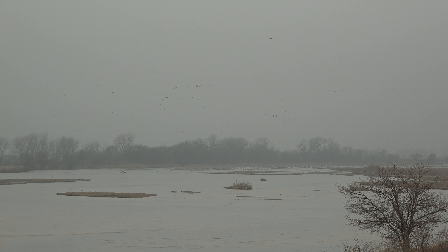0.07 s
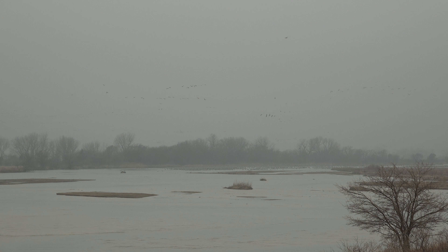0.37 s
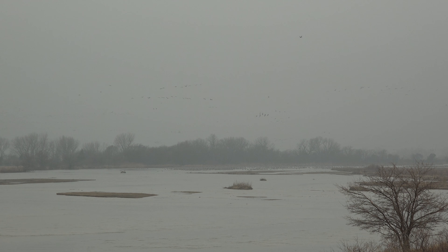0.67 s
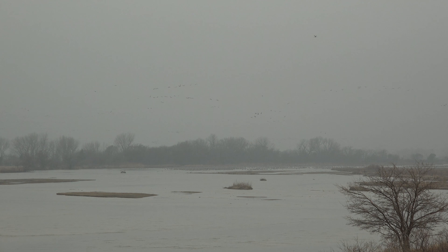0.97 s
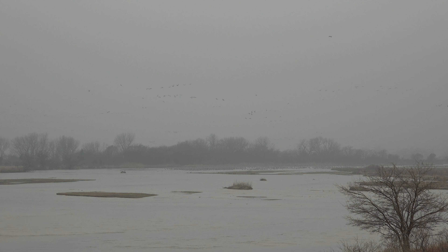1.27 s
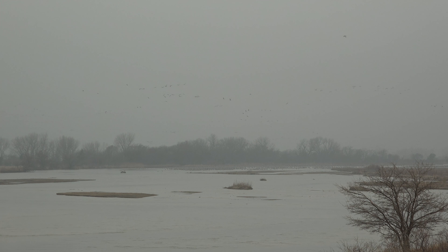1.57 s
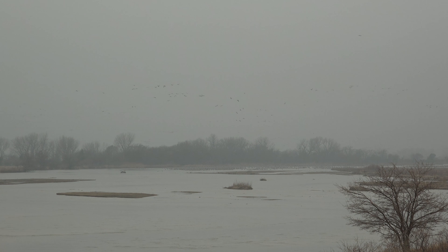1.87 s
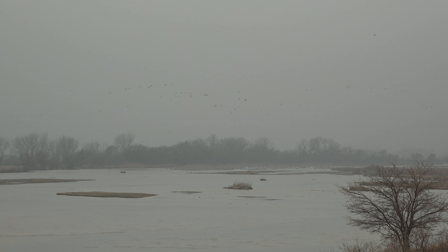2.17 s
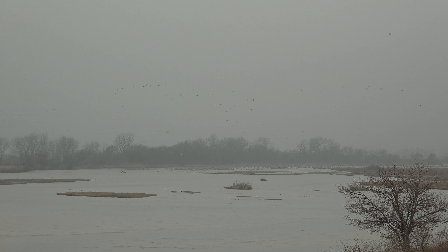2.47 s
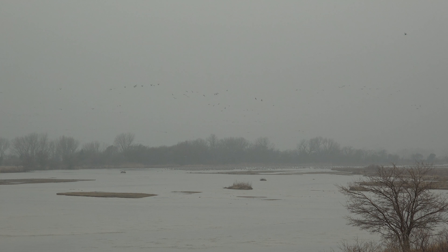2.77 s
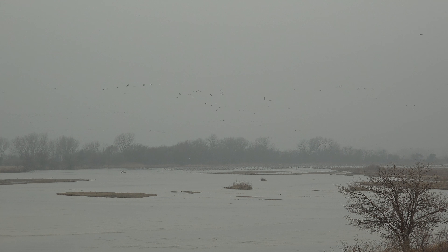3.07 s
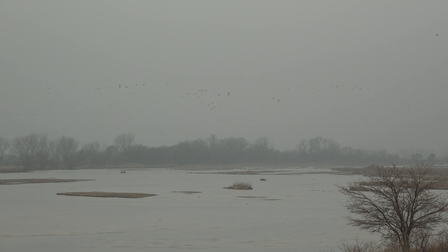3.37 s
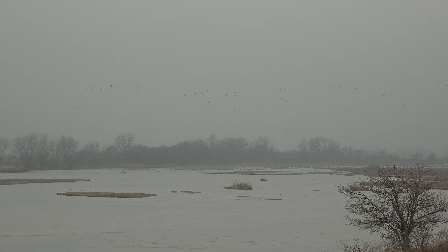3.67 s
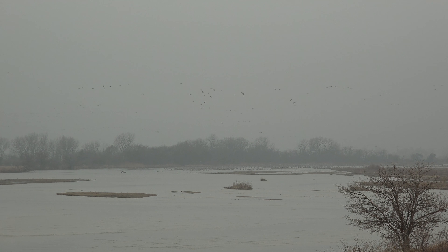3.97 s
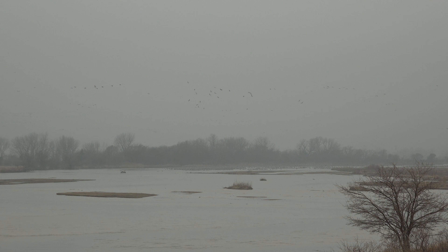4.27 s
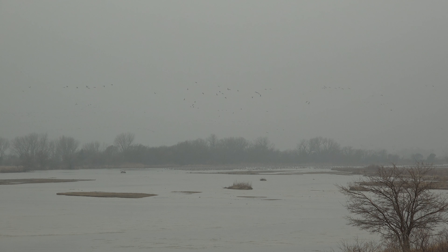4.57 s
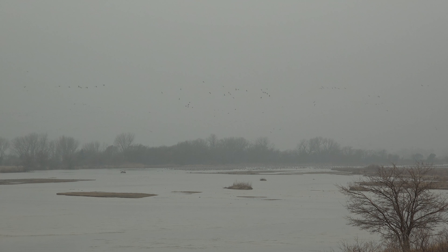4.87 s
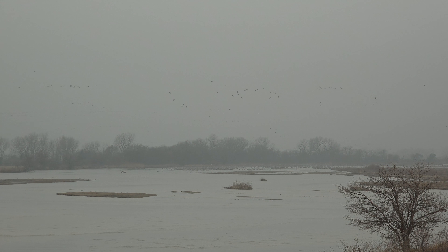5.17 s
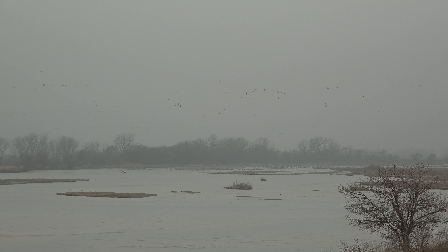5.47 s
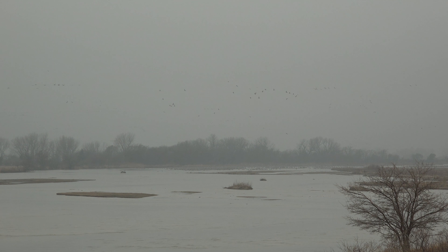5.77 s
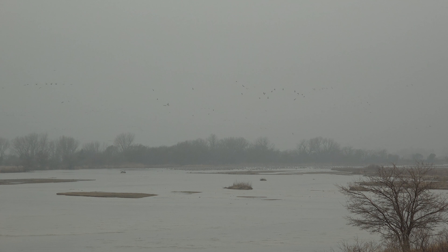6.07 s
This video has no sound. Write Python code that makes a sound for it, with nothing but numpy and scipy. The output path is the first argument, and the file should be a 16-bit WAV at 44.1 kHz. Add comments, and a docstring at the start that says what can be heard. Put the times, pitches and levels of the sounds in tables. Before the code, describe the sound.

A large flock of cranes calls continuously in the distance while a few nearer birds give loud, rolling, trumpeting rattles.

```python
"""Sandhill cranes over a wide river

A few near cranes bugle: a rattle of short falling notes, about 23 a second, often closed by one long
sagging note. Membranes in each bird's voice box buzz, and its windpipe and bill shape the tone.
Birds further out answer, hundreds more merge into a chorus, and the calls echo off brush and banks.
Under it all lie a low rumble, a faint hiss, a thin whistle and a few ticks."""
import sys
import numpy as np
from scipy import signal
from scipy.fft import rfft, irfft, next_fast_len
from scipy.io import wavfile

SR = 44100
rng = np.random.default_rng(int(sys.argv[2]) if len(sys.argv) > 2 else 0)


def dump_mix(stems):
    """Bounce the given channels to the path in sys.argv[1] as a 16-bit WAV at rate SR."""
    frames = np.atleast_2d(stems).T  # one column per channel
    limited = np.clip(frames, -1, 1)  # hard clip at full scale
    pcm = np.round(limited * 32767).astype(np.int16)
    wavfile.write(sys.argv[1], SR, pcm)


N = 269451
TOP_HZ = 15800  # upper limit of the treble

# Tone of the open air's rumble and hiss: frequency_hz, gain_db
AIR_TONE = [(20, -18), (45, -3), (70, 0.5), (100, -1), (200, -7), (350, -8), (1000, -20), (4000, -40.5),
            (9000, -36), (15500, -34.5)]
# Faint, distant swells of rumble: peak_time_s, level_db
DISTANT_RUMBLES = [(1.201, -59.5), (1.898, -57.5), (4.08, -61)]
# Tone of those swells: frequency_hz, gain_db
RUMBLE_TONE = [(90, -20), (190, 1), (300, -4), (600, -26.5), (2000, -63.5)]
# Small dry ticks: start_s, relative_peak_db
DRY_TICKS = [(2.0073, -42), (2.328, -40.5), (3.5109, -44), (5.6505, -39)]
# How the far flock grows louder and softer: time_s, level_db
FLOCK_LEVELS = [(0, -26.5), (.5, -26.5), (1.1, -27.5), (2.1, -27), (2.45, -28), (3.6, -28), (4, -26.5),
                (4.4, -26), (4.72, -31), (5.1, -27), (5.38, -30), (5.7, -27), (6.11, -31)]
# Tone of the far flock: frequency_hz, gain_db
FLOCK_TONE = [(200, -65), (380, -21), (480, -8), (580, -16.5), (720, -5), (880, -1.5), (1060, -2),
              (1250, -9), (1500, -11), (2100, -17.5), (2700, -22.5), (3900, -24), (6000, -33.5),
              (8500, -43)]
# How a crane's windpipe and bill shape its overtones: frequency_hz, gain_db
THROAT_TONE = [(1400, -9), (1820, -10.5), (2150, -20), (2750, -20.5), (3200, -17), (3650, -15), (4500, -21),
               (5100, -15), (6300, -18), (7400, -23), (8400, -33), (10500, -43.5), (15000, -65)]
# In the calls below, presence is the low treble (3300-4500 Hz) and brilliance the high (5700-7500 Hz).
# Rattles of birds further out: start_s, end_s, note_count, pitch_hz, gain_db, presence_db, brilliance_db
ANSWER_CALLS = [(.59, .695, 3, 804, -25, -24, -40), (.931, 1.096, 4, 670, -24, -31, -36),
                (1.14, 1.285, 4, 726, -25.5, -27.5, -35), (1.451, 1.605, 4, 1110, -29, -29, -33),
                (1.974, 2.145, 5, 838, -28.5, -26, -29), (2.385, 2.518, 4, 1120, -31, -12, -32),
                (3.102, 3.312, 5, 840, -25, -21, -32), (3.352, 3.436, 3, 799, -31, -10, -29),
                (5.005, 5.164, 4, 838, -24, -26, -33), (5.545, 5.669, 4, 1060, -33, -21, -26)]
# Long notes; high ones close a rattle, low ones are faint held undertones beneath the calls.
# start_s, length_s, pitch_hz, gain_db, presence_db, brilliance_db, pan_db (left minus right)
LONG_NOTES = [(0.479, .084, 918, -19.5, -24, -25.5, 2.5), (0.462, 0.13, 579.4, -33, -48, -38, -2.5),
              (0.625, 0.037, 958, -24, -41, -40, -1), (.8, 0.075, 508.5, -40.5, -46, -48, -1),
              (0.958, .093, 940, -23.5, -30.5, -24.5, -1), (3.026, 0.089, 909, -20, -22.5, -33, 2.5),
              (4.254, 0.097, 1015, -18, -30, -31.5, -5), (4.271, 0.19, 569.3, -34, -50, -48, -5.5),
              (4.452, .15, 587, -34, -43, -36, -3), (4.544, .1, 927.6, -20, -28.5, -33.5, 0),
              (5.085, 0.22, 1236, -33.5, -31, -40, 14.5), (5.37, 0.22, 564.5, -41, -38, -46, -6),
              (6.058, 0.14, 904.4, -20, -22, -31, 0)]
# Near rattles. Swell and brighten are changes from first note to last; top lifts or dulls the top octave.
# start_s, end_s, note_count, pitch_hz, fall_s, gain_db, swell_db, presence_db, brilliance_db,
# brighten_db, top_db, flutter (0 to 1), pan_db
NEAR_CALLS = [(0.2097, 0.467, 7, 1096, 0.0285, -12, 4, -16.5, -21.5, 0.5, 2.5, 0.76, 4),
              (0.564, 0.694, 4, 1077, 0.0231, -17, -7, -25.5, -22.5, 1.5, 1, 0.7, .5),
              (0.769, 0.937, 5, 1151, 0.018, -16, 2.5, -25, -22, -4.5, 7.5, 0.2, 1),
              (1.05, 1.268, 6, 986, 0.028, -21.5, -0.5, -22, -21, -4, -3, 0.92, -0.5),
              (2.7562, 3.012, 7, 1076, 0.0281, -11, 4, -23, -36.5, 2, 14.5, 0.38, 2.5),
              (3.1146, 3.207, 3, 924, 0.0264, -22, -4.5, -27.5, -26, 0, -14.5, 1, 0.5),
              (3.695, 3.888, 5, 886, 0.0213, -20, 1.5, -25, -28.5, -1, 4, 0.06, 0),
              (4.0723, 4.279, 6, 1150, 0.0168, -11, 5.5, -25.5, -24, 3, 9.5, 0.56, 0),
              (4.263, 4.39, 4, 1024, 0.0239, -12.5, -5, -22, -33, 5, 9, 0.5, 1.5),
              (4.3147, 4.526, 6, 1116, 0.0226, -11.5, 2.5, -19.5, -29.5, -5, 10.5, 0.4, 0),
              (4.914, 5.198, 8, 1247, 0.025, -23, -1, -21.5, -29.5, -3, -23, 0.7, 5),
              (5.786, 6.0452, 7, 1072, 0.0278, -12.5, 3, -23.5, -34.5, 12.5, 8, 0.6, -1.5)]


def undb(db):
    """Turn decibels into a number to multiply by."""
    return 10 ** (np.asarray(db) / 20)


def level(x, db):
    """Set a sound's average (rms) level."""
    return x * undb(db) / np.sqrt(np.mean(x ** 2))


def gain_at(hz, points):
    """Look up the gain at a frequency in a tone table."""
    table_hz, db = np.transpose(points)
    return undb(np.interp(np.log(hz + 1), np.log(table_hz), db))


def colour(x, points):
    """Filter a sound with a tone table."""
    size = next_fast_len(N + 4096)
    hz = np.arange(size // 2 + 1) * SR / size
    return irfft(rfft(x, size) * gain_at(hz, points), size)[..., :N]


def wander(count, rate):
    """A random curve that drifts to a new value rate times a second, for up to 256 values."""
    return np.interp(np.arange(count) * rate / SR, np.arange(256), rng.standard_normal(256))


def add(out, start_s, sound, pan_db=0):
    """Mix a sound into both channels; a positive pan moves it left."""
    start = int(start_s * SR)
    a, b = max(start, 0), min(start + len(sound), N)
    if b > a:
        out[:, a:b] += undb([[pan_db / 2], [-pan_db / 2]]) * sound[a - start:b - start]


def open_air(air_db=-59, side_db=-14):
    """Low rumble and faint hiss, nearly the same at both ears, with a few soft distant swells."""
    middle, side = colour(rng.standard_normal((2, N)), AIR_TONE)
    air = level(middle + undb(side_db) * side * np.array([[1], [-1]]), air_db)
    air *= undb(wander(N, 3.6))
    rumble = level(colour(rng.standard_normal(N), RUMBLE_TONE), 0)
    t = np.arange(N) / SR
    swells = sum(undb(db) * np.exp(-((t - peak_s) / 0.27) ** 2) for peak_s, db in DISTANT_RUMBLES)
    return air + rumble * swells


def thin_whistle(peak_db=-46):
    """One faint, short whistle that slides down in pitch."""
    out = np.zeros((2, N))
    progress = np.linspace(0, 1, int(.07 * SR))
    hz = (3900 - 500 * progress) * (1 + 0.015 * wander(len(progress), 450))
    tone = np.sin(2 * np.pi * np.cumsum(hz) / SR)
    add(out, 1.345, undb(peak_db) * np.sin(np.pi * progress) * tone, pan_db=3)
    return out


def dry_ticks(gain_db=-7, fade_s=0.00097):
    """Tiny snaps of high noise that die away at once."""
    out = np.zeros((2, N))
    treble = signal.butter(4, [6000, 8800], "band", fs=SR, output="sos")
    for start_s, db in DRY_TICKS:
        snap = rng.standard_normal(400) * np.exp(-np.arange(400) / SR / fade_s)
        snap = signal.sosfilt(treble, snap)
        add(out, start_s, undb(db + gain_db) * snap / np.abs(snap).max())
    return out


def echoes(x, echo_db, decay_s, dull_hz, build_s):
    """Brush and banks scatter sound into echoes that build up and fade, differently at each ear."""
    t = np.arange(SR) / SR
    tail = rng.standard_normal((2, SR)) * undb(-60 * t / decay_s) * np.minimum(t / build_s, 1) ** 2
    tail = signal.sosfilt(signal.butter(1, dull_hz, fs=SR, output="sos"), tail)
    tail *= undb(echo_db) / np.sqrt(np.sum(tail ** 2) / 2)
    return signal.fftconvolve(x, tail, axes=1)[:, :N]


def far_flock(count=460, spread_db=3, jitter=0.03478, pan_db=2, width_db=4):
    """Hundreds of rattles, each with its own pitch, speed and direction; air and windpipes dull them."""
    out = np.zeros((2, N))
    t = np.arange(SR // 2) / SR
    swell = np.sin(2 * np.pi * t) ** .5
    for i in range(count):
        delay, tempo, offset = rng.random(3)
        nearness, side = rng.standard_normal(2)
        nearness = np.clip(nearness, -2, 1.5)
        height = (i * (np.sqrt(5) - 1) / 2) % 1  # keeps low and high voices evenly mixed
        cycle = (offset + (18 + 7 * tempo) * t + 0.1204 * wander(len(t), 12)) % 1  # 0 to 1 in each note
        hz = 600 * 2.2 ** height * (1 - .18 * cycle) * (1 - .12 * t)
        hz *= 1 + jitter * wander(len(t), 500)
        phase = (2 * np.pi * np.cumsum(hz) / SR).astype(np.float32)
        # each overtone is a share of the one below; nearer birds keep more
        share = .74 + .07 * nearness
        buzz = np.sin(phase) / (1 + share ** 2 - 2 * share * np.cos(phase))
        push = np.minimum(cycle / 0.062, 1) * np.maximum(1 - cycle / 0.73, 0)
        start_s = (i + delay) / count * (N / SR + .5) - .5
        add(out, start_s, undb(spread_db * nearness) * swell * push * buzz, width_db * side)
    out += echoes(out, echo_db=-5.5, decay_s=0.92, dull_hz=3820, build_s=0.05)
    db = np.interp(np.arange(N) / SR, *np.transpose(FLOCK_LEVELS))
    return level(colour(out, FLOCK_TONE), 0) * undb(db + np.array([[pan_db], [-pan_db]]) / 2)


def crane_voice(hz, push, presence_db, brilliance_db, jitter, rasp, top_db=-10, base_db=-20, crack=0):
    """Buzzing membranes, shaped by windpipe and bill; a harder push sounds louder and brighter."""
    count = len(hz)
    phase = 2 * np.pi * np.cumsum(hz * (1 + jitter * wander(count, 1394))) / SR
    k = np.arange(2, 18)[:, None]  # overtones lie at these multiples of the pitch
    bill = gain_at(k * hz, [(2000, base_db), (3300, presence_db), (4500, presence_db),
                            (5700, brilliance_db), (7500, brilliance_db), (10500, brilliance_db + top_db)])
    gains = gain_at(k * hz, THROAT_TONE) * bill / undb(base_db) * (k * hz < TOP_HZ)
    # the membranes rattle, adding noise to each overtone, less to the lowest ones
    noise = np.array([wander(count, 1100) + 1j * wander(count, 1100) for _ in k])
    rough = rasp * np.minimum(k / 4, 1)
    waves = np.imag((1 + rough * noise) * np.exp(1j * (k * phase + k ** 2))) / np.sqrt(1 + rough ** 2)
    overtones = (gains * waves).sum(axis=0)
    # overtones flare as the membranes slam open, and again as the pitch settles
    t = np.arange(count) / SR
    flare = 1 + crack * (np.exp(-((t - .0035) / 0.004) ** 2) + np.exp(-((t - .0175) / 0.0045) ** 2))
    uneven = 1 + 0.039 * np.sin(phase / 2)  # every other cycle is stronger
    return push * (np.sin(phase) + push ** 0.18 * flare * overtones) * uneven


def rattle_note(hz, fall_s, flutter, attack_s=0.0024, drop=0.1402, flutter_hz=132):
    """Pitch and push of one short note: it scoops up into a burst, flutters and settles lower."""
    length_s = 1.415 * fall_s
    t = np.arange(int(length_s * SR)) / SR
    detune, speed, strength, steepness = rng.standard_normal(4)
    beat = np.cos(2 * np.pi * flutter_hz * (1 + 0.095 * speed) * (t - attack_s))
    depth = np.clip(flutter * (1 + 0.29 * strength), 0, 1) * np.exp(-t / .026)
    burst = np.minimum(t / attack_s, 1) * np.exp(-t / .023)
    release = np.clip((length_s - t) / fall_s * 2, 0, 1)
    push = burst * (1 - depth * (1 - beat) / 2) * release
    fall = drop * (1 + 0.24 * steepness) * np.tanh((t / (.5 * fall_s)) ** 1.816)
    scoop = 0.088 * np.exp(-t / 0.0022)
    slide = 1 - fall + 0.041 * depth * beat - scoop
    return hz * (1 + .018 * detune) * slide, push


def rattle_rhythm(start_s, end_s, notes, slowing=.012, arch_db=2):
    """Time, place (-0.5 to 0.5) and accent of each note; a rattle slows and is loudest mid-way."""
    k = np.arange(notes)
    beats = k + slowing * k * (k - 1) / 2
    place = np.linspace(-.5, .5, notes)
    accent_db = 0.5 * (k == 0) + arch_db * (np.cos(np.pi * place) - 1) - 0.25 * rng.standard_normal(notes)
    return zip(start_s + (end_s - start_s) * beats / beats[-1], place, accent_db)


def answering_cranes(pan_db=-1.5, width_db=2):
    """Rattles that stand out of the chorus, dulled by distance."""
    out = np.zeros((2, N))
    for start_s, end_s, notes, hz, db, presence_db, brilliance_db in ANSWER_CALLS:
        side_db = pan_db + width_db * rng.standard_normal()
        for note_s, _, accent_db in rattle_rhythm(start_s, end_s, notes):
            pitch, push = rattle_note(hz, fall_s=0.0291, flutter=0.74, attack_s=0.0035, drop=0.1066)
            sound = crane_voice(pitch, push, presence_db, brilliance_db, jitter=0.029, rasp=0.36)
            add(out, note_s, undb(db + accent_db) * sound, side_db)
    return colour(out, [(1200, 6.5), (1700, -3.5)])


def near_wails(gain_db=-1, high_note_hz=900):
    """Cleaner long notes that tremble and sag as the bird runs out of air; low notes sag less."""
    out = np.zeros((2, N))
    for start_s, length_s, hz, db, presence_db, brilliance_db, pan_db in LONG_NOTES:
        progress = np.linspace(0, 1, int(length_s * SR))
        sag = 1 - min(hz / high_note_hz, 1) ** 3 * (.032 * progress + 0.11 * progress ** 5)
        tremble = (1 + .16 * wander(len(progress), 260)).clip(0)
        push = np.minimum(progress / 0.11, 1) * np.minimum((1 - progress) / 0.31, 1) * tremble
        sound = crane_voice(hz * sag, push, presence_db, brilliance_db, jitter=.011, rasp=.36, top_db=7)
        add(out, start_s, undb(db + gain_db) * sound, pan_db)
    return out


def near_rattles(scatter_db=2.5):
    """Raspy rattles that swell or fade and brighten or dull; some notes crack harder than others."""
    out = np.zeros((2, N))
    for (start_s, end_s, notes, hz, fall_s, db, swell_db, presence_db, brilliance_db,
         brighten_db, top_db, flutter, pan_db) in NEAR_CALLS:
        for note_s, place, accent_db in rattle_rhythm(start_s, end_s, notes):
            bright_db = brighten_db * place + scatter_db * rng.standard_normal()
            pitch, push = rattle_note(hz, fall_s, flutter)
            sound = crane_voice(pitch, push, presence_db + 0.26 * bright_db, brilliance_db + bright_db,
                                jitter=0.028, rasp=.7, top_db=top_db, base_db=-12.5, crack=1.3)
            add(out, note_s, undb(db + swell_db * place + accent_db) * sound, pan_db)
    return out


def scene():
    """Near and far cranes and their echoes over the open river."""
    calls = near_rattles() + near_wails() + answering_cranes()
    cranes = colour(calls, [(380, -8.5), (520, -1)])  # thin out the lows below about 500 Hz
    brush = echoes(cranes, echo_db=-8, decay_s=0.061, dull_hz=10700, build_s=0.004)
    far_bank = echoes(cranes, echo_db=-22.5, decay_s=0.99, dull_hz=2000, build_s=0.017)
    return cranes + brush + far_bank + far_flock() + thin_whistle() + dry_ticks() + open_air()


def record(dry):
    """Cut away the very highest treble."""
    return signal.sosfilt(signal.ellip(8, .2, 70, TOP_HZ, fs=SR, output="sos"), dry)


dry = scene()
out = record(dry)
dump_mix(out)
```